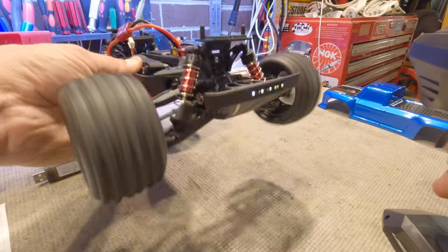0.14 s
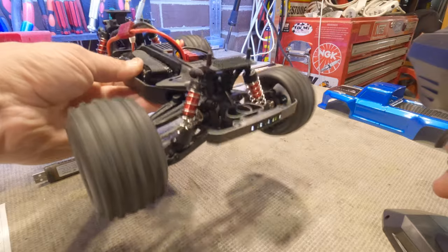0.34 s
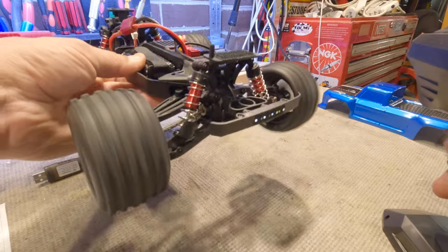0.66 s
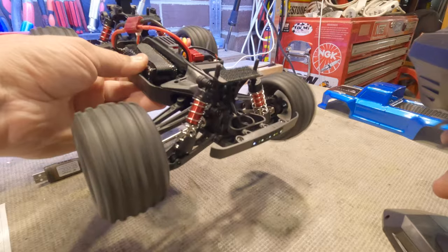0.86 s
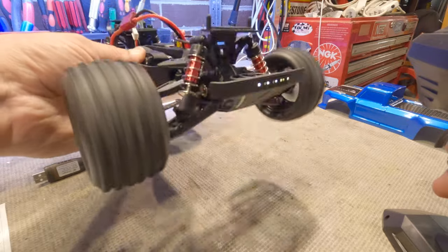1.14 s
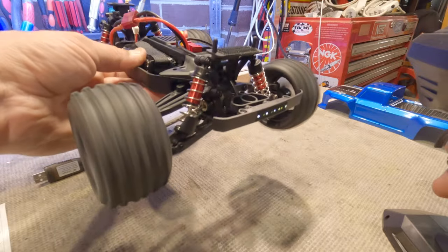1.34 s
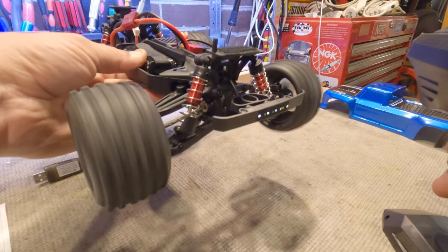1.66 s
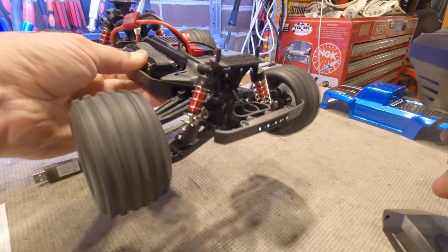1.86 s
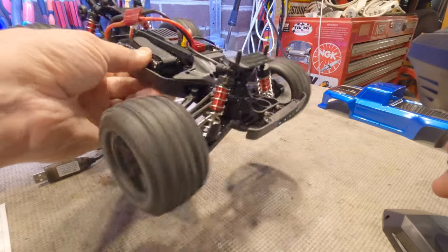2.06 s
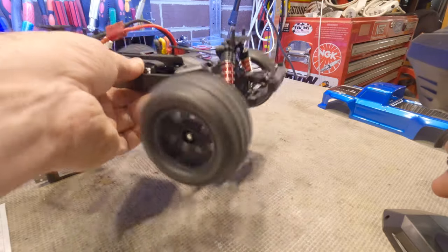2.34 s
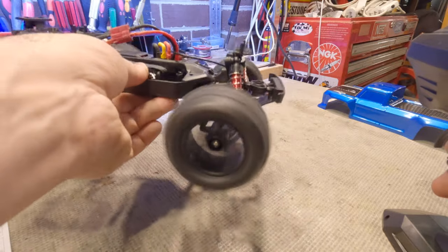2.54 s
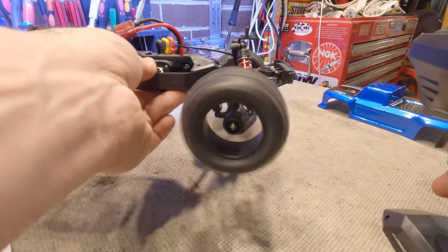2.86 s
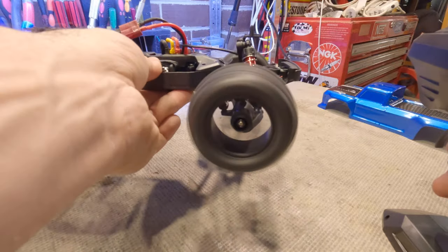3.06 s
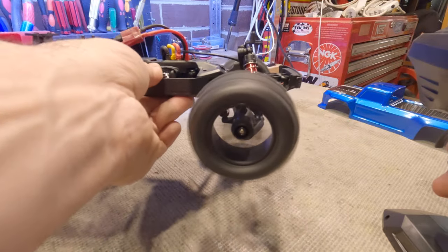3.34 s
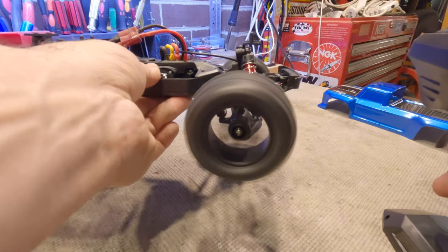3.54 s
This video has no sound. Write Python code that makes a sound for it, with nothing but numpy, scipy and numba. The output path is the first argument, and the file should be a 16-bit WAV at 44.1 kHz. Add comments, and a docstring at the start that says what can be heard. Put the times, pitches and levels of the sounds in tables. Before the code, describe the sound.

A small electric truck's motor and plastic gears roar close by, a dense, bright, hissy rattle with buzzing hum and faint low tyre rumble. A squeal sweeps up at about 0.1 s, then full speed holds until 0.8. It coasts with falling, chattering whine, revs again at 1.1, coasts from 1.9, and revs at 2.2, staying flat out to the end, its tone shifting as it turns sideways.

```python
"""The main source is the drive of a small electric truck, held in the air close to a stereo microphone, wheels
spinning freely. Three throttle bursts: band noise at the pinion's tooth rate squeals through shell resonances.
Behind it, noise and ticks make the rattle of gears in a plastic chassis; sines make gear, shaft and motor hum.
The gears chatter while coasting, and the hand begins to turn the truck sideways just before the last burst.
Low filtered noise is the rumble of tyres and air; the microphone stage rounds the loudest peaks."""
import sys
import numpy as np
from scipy import signal
from scipy.fft import rfft, irfft
from scipy.io import wavfile
from scipy.ndimage import uniform_filter1d
from numba import njit

SR = 44100
rng = np.random.default_rng(int(sys.argv[2]) if len(sys.argv) > 2 else 0)


def wav_out(sig):
    """Save sig, one row per channel (or a flat mono array), as 16-bit PCM at SR to the path in sys.argv[1]."""
    wavfile.write(sys.argv[1], SR, np.round(np.clip(np.atleast_2d(sig).T, -1, 1) * 32767).astype(np.int16))


N = 163170

# Throttle bursts: [slack knock t/s, chatter stops t/s, speeding up begins t/s, released t/s, squeal level/dB]
THROTTLE_BURSTS = [(0.0, 0.02, 0.092, 0.785, 1.5), (0.982, 1.02, 1.078, 1.862, -1),
                   (2.125, 2.157, 2.218, 3.9, -2)]
# Low rumble of tyres and air: [f/Hz, relative density level/dB]
RUMBLE_SPECTRUM = [(12, -13), (25, 0.5), (33, 2.5), (42, -3), (58, 3.5), (78, -11.5), (120, -12.5),
                   (160, -30)]
# Tones locked to the wheel shaft: [multiple of shaft rate, facing rms level/dB, sideways rms level/dB,
# coasting change level/dB]
SHAFT_TONE_TABLE = [(2, -52, -52, -3), (3, -56, -56, -3), (4, -52, -45, -5), (6, -53, -48, -5),
                    (8, -57, -54, -3), (10, -58, -57, -3), (12, -50, -47, -4), (13, -57, -55, -3),
                    (17, -50, -49, -3), (18, -45, -45, -3), (20, -49, -48, -3), (22, -46, -45, -3),
                    (24, -33, -38, -4), (27, -33, -33, -4), (29, -42, -40, -3), (32, -41, -39, -3),
                    (33, -39, -38, -3), (36, -33, -31, -4), (39, -38, -39, -3), (40, -40, -38, -3),
                    (58, -44, -42, -3), (63, -43, -41, -3), (66, -42, -47, -3), (69, -44, -40, -3),
                    (75, -42, -38, -3), (78, -41, -45, -3), (81, -43, -37, -3), (83, -45, -43, -3)]
# Tones locked to the motor: [multiple of motor rate, facing rms level/dB, sideways rms level/dB,
# coasting change level/dB]
MOTOR_TONE_TABLE = [(1, -53.5, -53, 1), (2, -37.5, -38, -3), (3, -45, -51, -3), (4, -42.5, -37, 5),
                    (6, -47, -44, 5)]
# Gear mesh tones: [multiple of shaft rate, facing rms level/dB, sideways rms level/dB,
# coasting change level/dB, pulling change level/dB]
MESH_TONE_TABLE = [(30, -37, -37, 10, 4), (60, -39, -37, 11.5, 5)]
# Chassis colour of the rattle, truck facing the microphone: [f/Hz, relative density level/dB]
FACING_COLOUR = [(60, -10.5), (130, -18.5), (250, -24), (500, -25), (640, -19), (790, -21), (1000, -15.5),
                 (1400, -2.5), (1800, -3), (2150, -1.5), (2420, -6.5), (2750, -13), (3150, -6.5),
                 (3600, -11), (4200, -4.5), (4700, -9), (5050, -4), (5600, -11), (6200, -7.5),
                 (8300, -16.5), (9800, -17.5), (11200, -23.5), (12500, -23), (14000, -28.5), (14900, -56)]
# Chassis colour of the rattle, truck turned sideways: [f/Hz, relative density level/dB]
SIDEWAYS_COLOUR = [(60, -21), (130, -24), (250, -21.5), (500, -25.5), (640, -19.5), (790, -21),
                   (1000, -13.5), (1400, -4.5), (1800, -2.5), (2150, 1), (2420, -1.5), (2750, -8.5),
                   (3150, -6), (3550, -10), (4300, -1.5), (5050, -7), (5700, -9.5), (6300, -10.5),
                   (8300, -17.5), (9800, -19.5), (11200, -21.5), (12500, -23), (14000, -27.5), (14900, -48)]
# Beat of the rattle: [multiple of shaft rate, depth in the treble, depth below]
RATTLE_BEAT = [(1, 0.098, 0.017), (2, 0.19, 0.16), (3, 0.058, 0.18), (4, 0.054, 0.03), (6, 0.16, 0.3)]
# Shell resonances the squeal passes through: [f/Hz, width f/Hz, facing level/dB, sideways level/dB]
SHELL_RESONANCES = [(4150, 1000, -2, -12), (4890, 600, 2, -6), (5500, 500, -3, 8), (6430, 700, 4, 3),
                    (7360, 800, -4, -1)]
# Stereo width by frequency: [f/Hz, unrelated side level/dB, quarter-cycle side level/dB,
# left minus right level/dB]
STEREO_WIDTH = [(40, -20.5, -40, -1.5), (250, -10.5, -35, 1), (684, -8, -50, -0.5), (1090, -10, -9.5, 0),
                (1460, -13.5, -22, 1), (2300, -15, -32, -1.5), (3300, -10, -29, -.5), (4700, -35, -62, 0),
                (5500, -58, -74, -2.5), (7760, -48, -31, 1.5), (11300, -13, -34, 0), (13000, -6, -20, 11),
                (13800, -2, -3, 2), (14600, -7, -20, 1)]

# Speed is a share of full speed; full-speed rates in Hz
START_SPEED, SPIN_UP_S, COAST_PER_S = .55, .036, 1.72
SHAFT_HZ, MOTOR_HZ, SPEED_WANDER = 53.53, 573.4, .0008
TURN_S, TURN_LENGTH_S = 1.993, 0.37
GLIDE_SHARE = .07  # speed loss at which the tones are fully unsteady

RUMBLE_DB, GUST_DB, GUST_HZ, RUMBLE_SIDEWAYS_DB = -40, 0.5, 5.07, -2

TONE_WAVER_DB, TONE_WAVER_HZ = 1.5, 14
TONE_SLOW_DB, TONE_ROUGH_DB, TONE_ROUGH_HZ = -49, 14, 45  # both dB values are per lost full speed
GLIDE_JITTER, GLIDE_JITTER_HZ = 0.3, 90  # phase shake in cycles
MESH_BODY_SHARE, MESH_ROUGH_DB, MESH_JITTER = .3, 2.5, .2  # chassis colour taken on; dB; cycles
MESH_BEAT = .6  # depth of the throb while coasting
MESH_SLOW_DB, MESH_LULL_DB = -20, -15  # per lost full speed; between chatter and pull

FACING_DB, SIDEWAYS_DB, LULL_DB = -20, -19.5, -1  # the rattle sinks between chatter and pull
TICKS_PER_S, TICK_SHARE, REPEAT_SHARE = 2500, 0.52, 0.13
TREBLE_HZ, FLICKER_HZ = 2690, 12
FLICKER_DB, CHATTER_DEPTH = (.8, .9), (0.043, 0.33)  # each: treble, below
TOP_FLICKER_DB, TOP_FLICKER_HZ, TOP_FROM_HZ = 1, 14, 7200

PINION_TEETH, SQUEAL_WIDTH_HZ = 13, 1300
SQUEAL_DB, SQUEAL_ATTACK_S, SQUEAL_FADE_S = -17.5, 0.068, 0.067  # level ahead of load and shell
TAKE_UP_DB, TAKE_UP_HZ, TAKE_UP_S = -44.5, 437, 0.009  # knock level ahead of its envelope

ROUNDING, TOP_HZ = 1.85, 14750  # drive into the peak rounding; top cut


def undb(db):
    """Gain of a dB value."""
    return 10 ** (np.asarray(db) / 20)


def level(x, db):
    """Scale to an rms level in dB."""
    return x * undb(db) / np.sqrt(np.mean(x ** 2))


def spectral_lines():
    """Frequency in Hz of every spectral line."""
    return np.arange(N // 2 + 1) * SR / N


def along(table, column=1):
    """Read a table column on a log-frequency axis at every spectral line."""
    rows = np.array(table, float)
    return np.interp(np.log(spectral_lines() + 1), np.log(rows[:, 0]), rows[:, column])


def colour(x, gain):
    """Weight the spectrum."""
    return irfft(rfft(x) * gain, N)


def above(corner_hz):
    """Spectral weight that rises smoothly to 1 above a corner."""
    return 1 / (1 + (corner_hz / (spectral_lines() + 1)) ** 6)


def walk(rate_hz):
    """Random levels held and slewed twice; spread near 1."""
    hold, step = int(SR / rate_hz / 32), np.arange(N // 32 + 2)  # one step every 32 samples
    held = rng.standard_normal(500)[step // hold]
    slewed = uniform_filter1d(uniform_filter1d(held, hold), hold)
    return np.interp(np.arange(N) / 32, step, 1.3 * slewed)


@njit
def moving_bandpass(x, hz, width):
    """State-variable band-pass with a moving centre, gain 1 at the centre."""
    y, band, low = np.empty(len(x)), 0., 0.
    for i in range(len(x)):
        g, k = np.tan(np.pi * hz[i] / SR), width / hz[i]
        v = (band + g * (x[i] - low)) / (1 + g * (g + k))
        band, low, y[i] = 2 * v - band, low + 2 * g * v, k * v
    return y


def ring(x, hz, width):
    """A fixed resonance: two equal band-passes in a row."""
    centre = np.full(N, 1. * hz)
    once = moving_bandpass(x, centre, 1. * width)
    return moving_bandpass(once, centre, 1. * width)


def drive(t):
    """Speed eases up to full under throttle and dies away without; coasting and the lull are 0-1."""
    speed, start = np.ones(N), START_SPEED
    coasting, lull = np.ones(N), np.zeros(N)
    for k, (_, calm, on, off, _) in enumerate(THROTTLE_BURSTS):
        u = np.clip(t - on, 0, off - on) / SPIN_UP_S
        spin_up = 1 - (1 - start) * (1 + u) * np.exp(-u)
        now = spin_up * np.exp(-COAST_PER_S * np.maximum(t - off, 0))
        speed = np.where(t >= on, now, speed) if k else now
        coasting[(t >= calm) & (t < off)] = 0
        lull[(t >= calm) & (t < on)] = 1
        if k + 1 < len(THROTTLE_BURSTS):
            start = now[int(THROTTLE_BURSTS[k + 1][2] * SR)]
    speed = speed * (1 + SPEED_WANDER * walk(4))
    return speed, uniform_filter1d(coasting, size=600), uniform_filter1d(lull, size=600)


def gliding(speed):
    """0 at full speed, 1 once the speed has dropped away."""
    return np.clip((1 - speed) / GLIDE_SHARE, 0, 1)


def rumble():
    """Low rumble of tyres and air: filtered noise with a slow gusty level."""
    low = colour(rng.standard_normal(N), undb(along([*RUMBLE_SPECTRUM, (400, -70)])))
    return level(low * undb(GUST_DB * walk(GUST_HZ)), RUMBLE_DB)


def tones(table, turns, speed, turned, coasting):
    """Wavering sines locked to a rotating part fade and break up as it slows."""
    out = 0
    for order, facing_db, side_db, coast_db in table:
        db = facing_db + (side_db - facing_db) * turned + coast_db * coasting
        db = db + TONE_WAVER_DB * walk(TONE_WAVER_HZ)
        db = db + (1 - speed) * (TONE_SLOW_DB + TONE_ROUGH_DB * walk(TONE_ROUGH_HZ))
        shake = GLIDE_JITTER * gliding(speed) * walk(GLIDE_JITTER_HZ)
        cycles = round(order) * turns + rng.random() + shake
        out = out + np.sqrt(2) * undb(db) * np.sin(2 * np.pi * cycles)
    return out


def mesh_whine(turns, speed, turned, coasting, lull):
    """The gear mesh sings out hoarsely in the glides, louder where it meets a chassis resonance."""
    out, body = 0, np.array(FACING_COLOUR).T
    glide = np.maximum(gliding(speed), coasting)
    beat = 1 + MESH_BEAT * coasting * np.cos(2 * np.pi * turns)  # once a shaft turn
    for order, facing_db, side_db, coast_db, pull_db in MESH_TONE_TABLE:
        hz = round(order) * SHAFT_HZ
        db = facing_db + (side_db - facing_db) * turned + TONE_WAVER_DB * walk(TONE_WAVER_HZ)
        db = db + MESH_BODY_SHARE * (np.interp(hz * speed, *body) - np.interp(hz, *body))
        db = db + MESH_SLOW_DB * (1 - speed) + MESH_LULL_DB * lull
        change_db = pull_db + (coast_db - pull_db) * coasting
        db = db + glide * (change_db + MESH_ROUGH_DB * walk(TONE_ROUGH_HZ))
        shake = MESH_JITTER * glide * walk(GLIDE_JITTER_HZ)
        cycles = round(order) * turns + rng.random() + shake
        out = out + np.sqrt(2) * undb(db) * np.sin(2 * np.pi * cycles)
    return out * beat


def rattle(turns, turned, coasting):
    """Dense tooth ticks and noise, partly the same each turn, beat with the shaft and ring the chassis."""
    ticks = (rng.random(N) < TICKS_PER_S / SR) * rng.standard_normal(N)
    repeating = rng.standard_normal(1024)[(turns % 1 * 1024).astype(int)]
    raw = TICK_SHARE * level(ticks, 0) + rng.standard_normal(N) + REPEAT_SHARE * repeating
    # the twice-a-turn beat has a fixed phase, the others a random one
    waves = [np.cos(2 * np.pi * (round(m) * turns + rng.random() * (m != 2))) for m, _, _ in RATTLE_BEAT]
    treble = above(TREBLE_HZ)
    body = 0
    for column, share in ((1, treble), (2, 1 - treble)):
        beat = 1 + sum(row[column] * wave for row, wave in zip(RATTLE_BEAT, waves))
        beat = beat + CHATTER_DEPTH[column - 1] * coasting * waves[0]  # chatter: once a shaft turn
        flicker = undb(FLICKER_DB[column - 1] * walk(FLICKER_HZ))
        body = body + colour(raw * beat * flicker, share)
    # the highest hiss flickers on its own
    top = above(TOP_FROM_HZ)
    top_flicker = undb(TOP_FLICKER_DB * walk(TOP_FLICKER_HZ))
    body = colour(body, 1 - top) + colour(body * top_flicker, top)
    facing = level(colour(body, undb(along(FACING_COLOUR))), FACING_DB)
    sideways = level(colour(body, undb(along(SIDEWAYS_COLOUR))), SIDEWAYS_DB)
    return (1 - turned) * facing + turned * sideways


def take_up_knock(t):
    """The gears take up their slack before each pull: short bursts of ringing noise."""
    envelope = 0
    for hit, *_ in THROTTLE_BURSTS:
        u = np.maximum(t - hit, 0) / TAKE_UP_S
        envelope = envelope + u * np.exp(1 - u)
    return level(ring(rng.standard_normal(N), TAKE_UP_HZ, 320), TAKE_UP_DB) * envelope


def squeal(t, speed, turned):
    """The loaded pinion rasps, a noise band around its tooth rate heard through the shell."""
    load = 0
    for hit, _, on, _, db in THROTTLE_BURSTS:
        rise = np.minimum(np.maximum(t - hit, 0) / (on - hit + SQUEAL_ATTACK_S), 1)
        since_peak = np.maximum(t - on - SQUEAL_ATTACK_S, 0)
        load = load + undb(db) * rise * np.exp(-since_peak / SQUEAL_FADE_S)
    tooth_hz = PINION_TEETH * MOTOR_HZ * speed
    mesh = moving_bandpass(rng.standard_normal(N), tooth_hz, 1. * SQUEAL_WIDTH_HZ)
    mesh = level(mesh, SQUEAL_DB) * load
    shell = 0
    for hz, width, facing_db, side_db in SHELL_RESONANCES:
        shell = shell + undb(facing_db + (side_db - facing_db) * turned) * ring(mesh, hz, width)
    return shell


def scene():
    """Close truck in the middle; fresh rattle and rumble and a filtered copy of the middle make the side."""
    t = np.arange(N) / SR
    speed, coasting, lull = drive(t)
    turned = np.clip((t - TURN_S) / TURN_LENGTH_S, 0, 1)  # 0 facing, 1 sideways
    run = np.cumsum(speed) / SR  # seconds' worth of full-speed running
    shaft_turns = SHAFT_HZ * run

    def noise():
        """A fresh draw of rumble and rattle."""
        gears = rattle(shaft_turns, turned, coasting) * undb(LULL_DB * lull)
        return gears + rumble() * undb(RUMBLE_SIDEWAYS_DB * turned)

    mid = noise()
    mid = mid + tones(SHAFT_TONE_TABLE, shaft_turns, speed, turned, coasting)
    mid = mid + tones(MOTOR_TONE_TABLE, MOTOR_HZ * run, speed, turned, coasting)
    mid = mid + mesh_whine(shaft_turns, speed, turned, coasting, lull)
    mid = mid + take_up_knock(t) + squeal(t, speed, turned)

    unrelated = colour(noise(), undb(along(STEREO_WIDTH, column=1)))
    quarter_cycle = 1j * undb(along(STEREO_WIDTH, column=2))
    balance = np.tanh(along(STEREO_WIDTH, column=3) * np.log(10) / 40)  # left minus right dB as side/mid
    side = unrelated + colour(mid, quarter_cycle + balance)
    return np.array([mid + side, mid - side])


def record(dry):
    """The microphone stage rounds the loudest peaks, then a steep low-pass cuts the top."""
    rounded = np.tanh(ROUNDING * dry) / ROUNDING
    return signal.sosfilt(signal.ellip(10, .2, 80, TOP_HZ, fs=SR, output="sos"), rounded)


dry = scene()
out = record(dry)
wav_out(out)
```